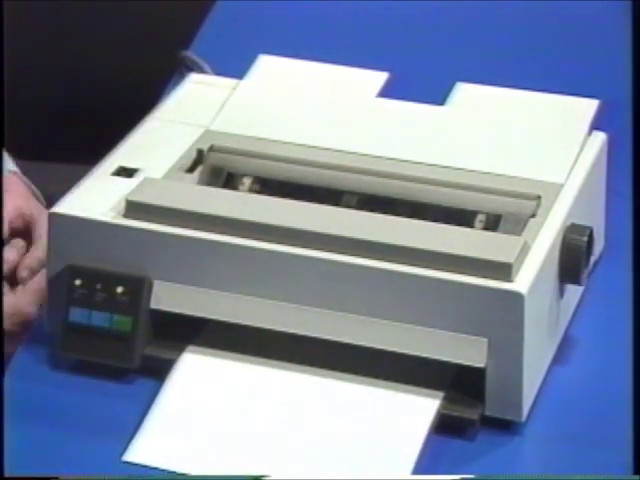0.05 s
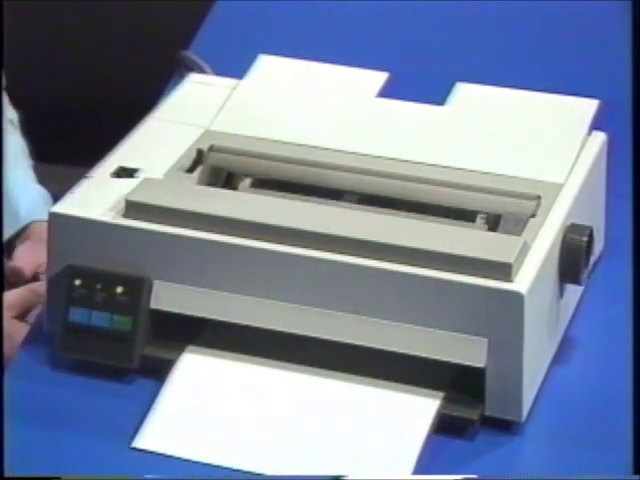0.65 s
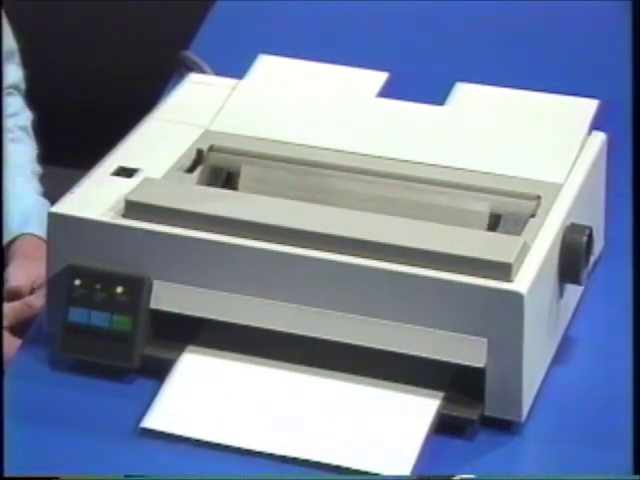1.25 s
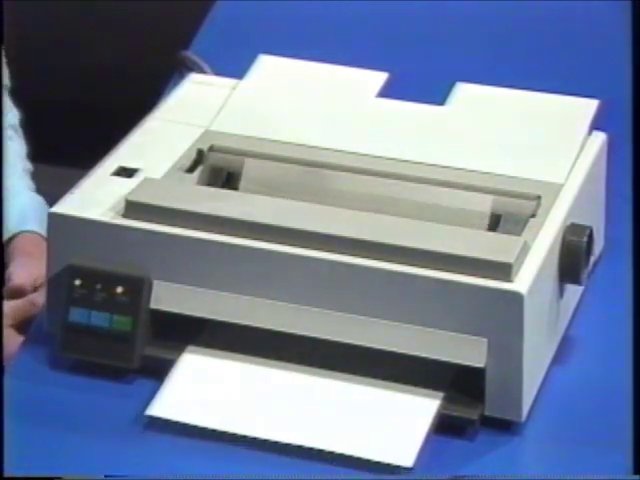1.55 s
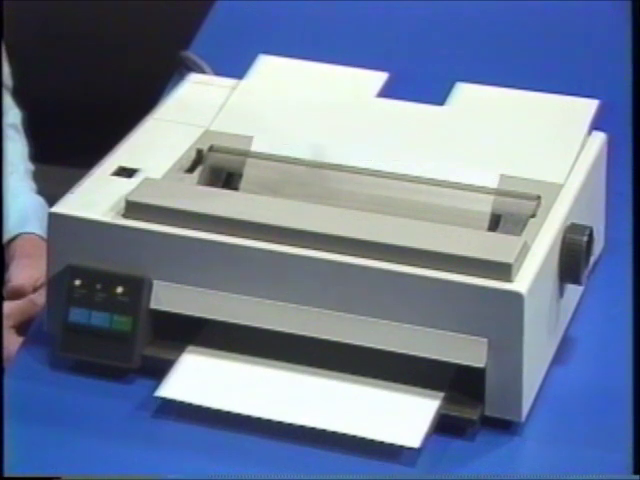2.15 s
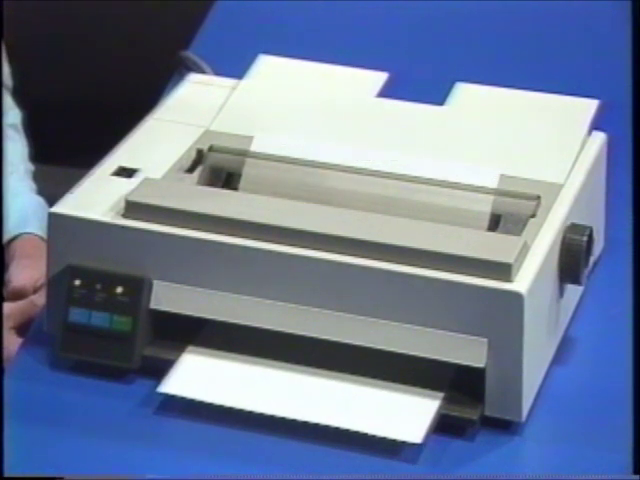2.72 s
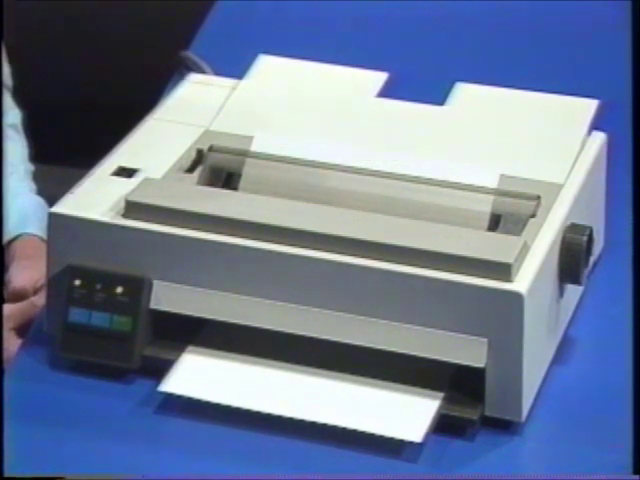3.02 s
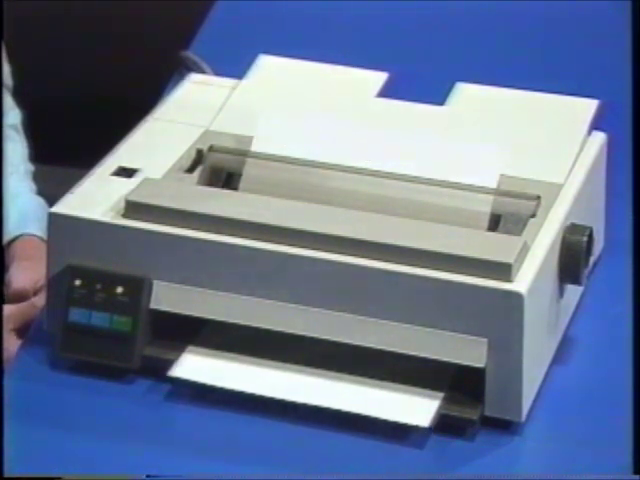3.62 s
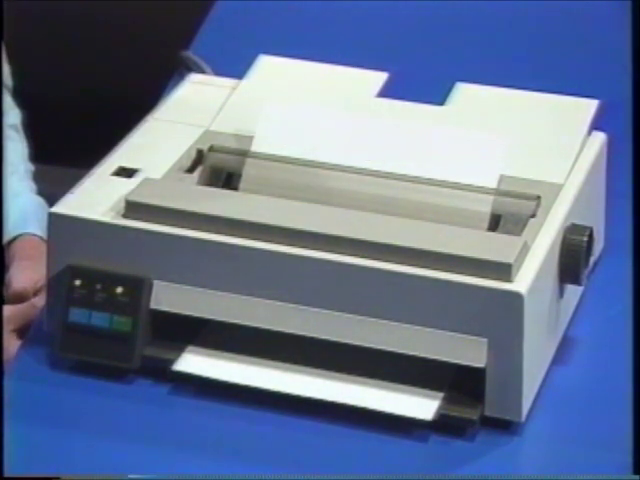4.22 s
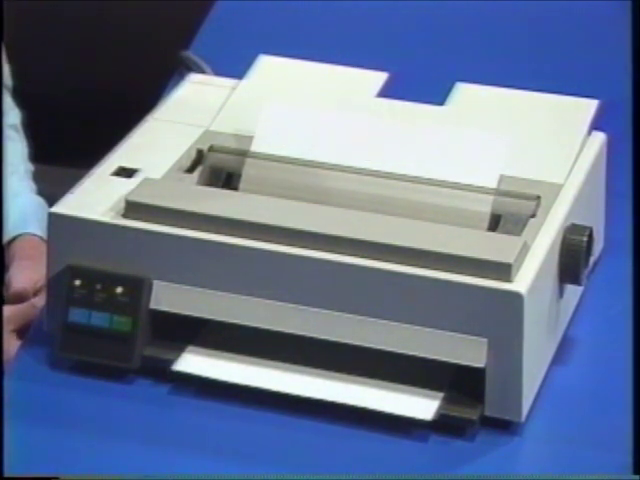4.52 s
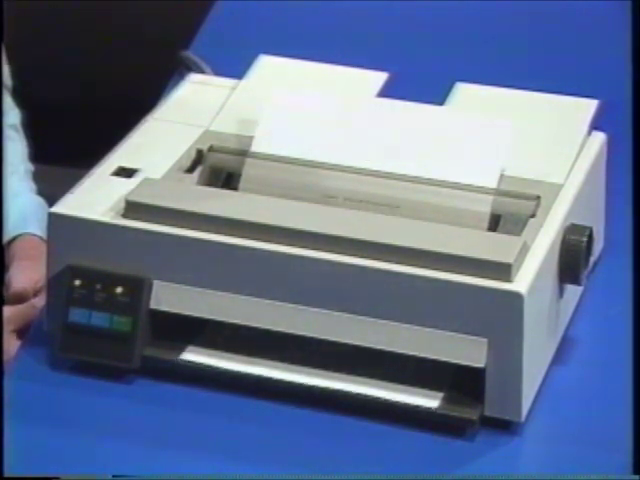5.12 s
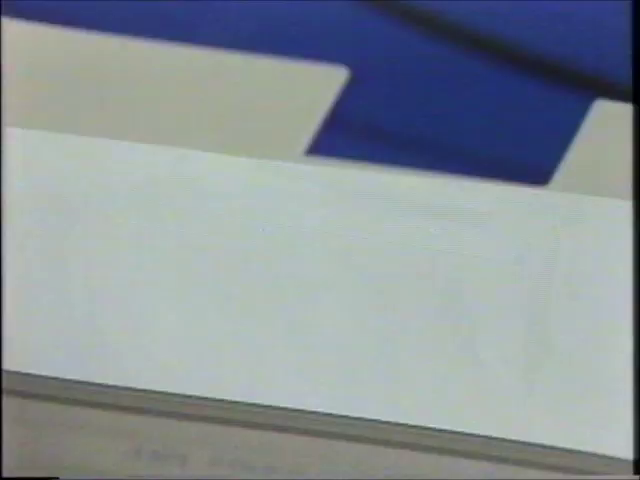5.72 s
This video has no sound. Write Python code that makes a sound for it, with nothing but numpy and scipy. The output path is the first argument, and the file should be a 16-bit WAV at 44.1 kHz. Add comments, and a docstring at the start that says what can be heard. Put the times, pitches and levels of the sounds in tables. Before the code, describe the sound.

Close up in a quiet, dry room, a dot matrix printer alternates between feeding and printing. Its gears clack quickly and regularly in the plastic case as the paper advances, then the carriage knocks into motion and whines on one steady pitch while the pins rattle in sharp, bright bursts. This happens three times, the first feed lasting longest and the last pass being briefest. Faint hum and a thin whistle lie underneath.

```python
"""Quick plastic clacks, seven a second: a dot matrix printer feeds paper, close up in a quiet, dry room.
Each line feed is a set pattern of gear blows ringing in the case, over the grunt of a stepper motor.
Three times the carriage jolts off and whines along its rail while the pins rattle out words on the
motor's step grid, fifty letters a second. Faint room noise, hum and coil whistle lie underneath."""
import sys
import numpy as np
from scipy import signal
from scipy.fft import rfft, irfft
from scipy.io import wavfile
from scipy.ndimage import uniform_filter1d

SR = 44100
rng = np.random.default_rng(int(sys.argv[2]) if len(sys.argv) > 2 else 0)


def to_wav(sig):
    """Store sig (one row per channel, or 1-D mono) as 16-bit WAV at the path in sys.argv[1].

    Samples outside -1..1 are clipped; the rate is SR.
    """
    pcm = np.clip(np.atleast_2d(sig), -1, 1) * 32767
    pcm = np.round(pcm).astype(np.int16)
    wavfile.write(sys.argv[1], SR, pcm.T)  # frames by channels


N = 262836
TIME = np.arange(N) / SR
RING_SIZE = 8192  # samples in an impulse response
RING_TIME = np.arange(RING_SIZE) / SR
FREQS = np.arange(RING_SIZE // 2 + 1) * SR / RING_SIZE + 1
STEP_HZ, LETTER_STEPS = 1202.9, 24  # carriage motor: step rate, steps per letter

# registers of the case (thud, knock, clack, tick): low_hz, high_hz, t60_s, whirr_db
REGISTERS = [(243, 656, 0.1, -52), (718, 2057, 0.053, -52), (2130, 5980, 0.036, -58.5),
             (5130, 23000, .022, -58.5)]
# tone colour of the plastic case: freq_hz, level_db
CASE_COLOUR = [(88, -22), (150, -3), (186, -8), (420, -5.5), (656, -11), (1060, -4.5), (1290, -13.5),
               (1420, -6.5), (2020, -9), (3760, -6), (6470, -16), (8830, -13), (15500, -33)]
# resonances of the case: centre_hz, width_hz, lift_db
CASE_MODES = [(348.4, 19, 7.9), (422, 19, 5.8), (569, 102, 7.4), (784.4, 38, 9.1), (983, 91, 4.8),
              (1091, 27, 7.4), (1182, 140, 8.5), (1437, 17, 8.7), (1660, 100, 7.6), (2620, 370, 10),
              (3152, 180, 11.1), (3756, 340, 7.8), (4400, 110, 1.1), (4810, 1030, 5.6), (7830, 1000, 5),
              (8890, 290, 7.6), (10390, 640, 5.6)]
# passes of the carriage: start_s, end_s, whine_db
CARRIAGE_RUNS = [(2.401, 3.025, -34.5), (4.115, 4.612, -34.5), (5.617, 5.947, -36)]
# printed words, with the relative force on each part: start_s, letters, platen_db, pins_db, shell_db
WORDS = [(2.7045, 3, -26.5, -22.5, -22), (2.782, 10, -28, -24, -25), (4.155, 8, -28.5, -24.5, -28),
         (4.333, 3, -28, -25, -23), (4.413, 8, -28.5, -26, -25), (5.814, 4, -28, -23.5, -22)]


def paper_feed(alike=0.46, whirr_s=0.08, scatter_db=1.12, jitter_s=0.0004):
    """Each feed strikes the case with the same blows, partly with the same ring; gears whirr between."""
    # blows in the four stages of a feed: delay_s, thud_db, knock_db, clack_db, tick_db
    engage = [(0, -57, -45, -40.5, -49), (.0035, -54.5, -47, -44.5, -52)]
    pull = [(.0092, -51, -38.5, -39, -33.5), (0.012, -49, -35, -32, -43.5)]
    rebound = [(0.0218, -49.5, -38, -36, -39), (0.0306, -45.5, -35.5, -34.5, -52),
               (.035, -49.5, -37.5, -40.5, -44.5), (0.042, -60, -68, -53, -62)]
    brake = [(0.067, -65, -51, -43, -41), (0.071, -60, -42.5, -35, -36.5), (.074, -48, -41, -44, -49),
             (0.0803, -50.5, -46.5, -40, -49), (0.091, -50, -43.5, -41, -45),
             (.103, -61, -49.5, -45.5, -59)]
    # usual force of each stage: force_db
    stage_db = [0.5, 1, -3, -1.5]
    # how much each stage varies from feed to feed: scatter_db
    stage_scatter_db = [4.8, 1.13, 0.64, 0.84]
    # feeds whose gears snap in hard: feed_index, engage_db
    snaps = [(0, 10), (2, 8), (3, 8), (5, 8), (6, 10), (8, 7), (14, 5.5), (16, 4.5), (20, 6.5)]
    starts = feed_times()
    turning = gate([(at, at + whirr_s) for at in starts], 0.0052, 0.016)
    blows = [(stage, blow) for stage, rows in enumerate([engage, pull, rebound, brake]) for blow in rows]
    forces = rng.normal(stage_db, stage_scatter_db, (len(starts), len(stage_db)))
    for feed, snap_db in snaps:
        forces[feed, 0] = snap_db
    slack = rng.standard_normal((len(starts), len(blows), 2))  # loose gears vary force and timing
    clacks = 0
    for k, (low_hz, high_hz, t60, whirr_db) in enumerate(REGISTERS):
        drive = undb(whirr_db) * turning * noise()
        fade = decay(t60)
        for b, (stage, (delay, *register_db)) in enumerate(blows):
            same_ring = np.sqrt(alike) * noise(RING_SIZE)
            for at, force_db, (harder, later) in zip(starts, forces, slack[:, b]):
                ring = same_ring + np.sqrt(1 - alike) * noise(RING_SIZE)
                stray_db = scatter_db * (harder + rng.standard_normal())
                size = undb(register_db[k] + force_db[stage] + stray_db)
                add(drive, at + delay + jitter_s * later, size * fade * ring)
        clacks = clacks + through(drive, body(CASE_COLOUR, CASE_MODES, low_hz, high_hz))
    return clacks + gear_teeth(turning)


def feed_times(late_s=0.011):
    """Start of every line feed: evenly paced within a run, the last one a little late."""
    # runs of line feeds: start_s, feeds, period_s
    runs = [(.0344, 17, .14084), (3.0703, 7, .1406), (4.657, 7, .1405)]
    return np.concatenate([at + period * np.arange(n) + late_s * (np.arange(n) == n - 1)
                           for at, n, period in runs])


def gear_teeth(turning, ticks_per_s=70, tick_db=-47, scatter_db=4, ring_s=0.0045, sing_db=-57):
    """While the gears turn, stray teeth tick and the train sings faintly."""
    teeth = (rng.random(N) < ticks_per_s / SR) * undb(scatter_db * np.clip(noise(), -2, 2))
    envelope = through(teeth * turning, decay(ring_s))
    ticks = envelope * through(noise(), body(CASE_COLOUR, CASE_MODES, 890, 10000))
    sing = turning * through(noise(), body([(4650, 0)], [(4615, 180, 17)], 2570, 4640))
    return undb(tick_db) * ticks + undb(sing_db) * sing


def feed_motor(gain_db=1, roughness=0.075):
    """The feed stepper grunts: its rate ramps up and down again within each feed."""
    # the motor's course through one feed: time_s, pitch_hz, relative_db
    ramp = [(0, 247, -56), (0.014, 327, -63), (.04, 402, -59), (0.061, 429, -45.5), (.08, 413, -53),
            (.1, 344, -77), (.13, 264, -81)]
    times, hz, db = np.transpose(ramp)
    phase = 2 * np.pi * np.cumsum(np.interp(RING_TIME, times, hz)) / SR
    swell = undb(gain_db + np.interp(RING_TIME, times, db)) * (RING_TIME < times[-1])
    grunts = np.zeros(N)
    for at in feed_times():
        add(grunts, at, swell * np.sin(phase))
    return grunts * (1 + roughness * sway())


def print_head(rumble_db=-20, case_db=-20):
    """Strikes sound in the platen, pins and head shell; the case rings and a low rumble swells along."""
    # tone colour of a pin strike: freq_hz, level_db
    colour = [(100, 9), (400, -6), (800, -4), (1400, 1.5), (2000, -6), (4000, -4), (6400, -2.5),
              (8000, -1.5), (11000, 0.5), (12400, 2), (13500, -3), (15500, -5.5)]
    # resonances of the head: centre_hz, width_hz, lift_db
    head_modes = [(2520, 300, 8), (3700, 140, 11), (4060, 170, 8), (4850, 200, 9), (5420, 170, 12),
                  (7390, 250, 10), (7840, 220, 8), (8440, 250, 6), (9690, 240, 11), (10230, 180, 11),
                  (10530, 220, 12), (10930, 260, 8), (11450, 260, 8), (14400, 300, 13)]
    # ring of its shell: centre_hz, width_hz, lift_db
    shell_modes = [(12450, 420, 22)]
    platen = strikes(0, body(colour, head_modes, 260, 7230), gain_db=1, ring_s=0.042, jitter_s=40e-6)
    pins = strikes(1, body(colour, head_modes, 7260), gain_db=1, ring_s=0.017, jitter_s=19e-6)
    shell = strikes(2, body(colour, shell_modes, 7800, 13300), gain_db=-2.5, ring_s=0.011, jitter_s=24e-6)
    direct = platen + pins + shell + platen_buzz()
    tail = decay(0.1) * noise(RING_SIZE)
    reverb = through(direct, tail / np.linalg.norm(tail))
    rumble_colour = [(28, 1.5), (45, -4.5), (90, -2.5), (160, -4.5), (300, -16.5)]
    rumble = stroke_force(TIME, part=1) * through(noise(), body(rumble_colour, high_hz=337))
    return direct + undb(case_db) * reverb + undb(rumble_db) * rumble


def strikes(part, response, gain_db, ring_s, jitter_s, favour=0.6, pins=9):
    """Pins fire on the step grid, each with its own ring; each half letter favours a few of them."""
    steps = np.arange(int(N / SR * STEP_HZ) - 2) / STEP_HZ
    force = stroke_force(steps, part)
    half_letter = np.arange(len(steps)) // (LETTER_STEPS // 2)
    favoured = rng.random((len(steps), pins))[half_letter]
    rank = (rng.random((len(steps), pins)) + favour * favoured).argsort(axis=1).argsort(axis=1)
    rattle = 0
    for pin in range(pins):
        fires = rank[:, pin] < 2  # two pins a step
        position = np.clip((steps + jitter_s * noise(len(steps))) * SR, 10, N - 10)[:, None]
        taps = position.astype(int) + np.arange(-7, 9)
        pulses = (force * fires)[:, None] * np.sinc(taps - position)  # clicks land between samples
        clicks = np.bincount(taps.ravel(), pulses.ravel(), N)
        ring = through(decay(ring_s) * noise(RING_SIZE), response)
        rattle = rattle + through(clicks, unit(ring))
    return unit(rattle) * np.sqrt(np.mean(force ** 2)) * undb(gain_db)


def stroke_force(times, part, bar=0.37, upright_s=0.0039, rise_s=0.0014, gap_s=0.00096):
    """Force on a part (0 platen, 1 pins, 2 shell): uprights hit hard, bars lightly, gaps not at all."""
    # upright strokes within a letter: delay_s, strength
    uprights = [(0.0008, 0.87), (.0085, 0.26), (0.0129, .62)]
    # scatter from letter to letter: platen_db, pins_db, shell_db
    scatter_db = [1.5, 2.05, 2.5]
    force, letter_s = np.zeros(len(times)), LETTER_STEPS / STEP_HZ
    for (_, letters, *part_db), (start, end) in zip(WORDS, word_spans()):
        inside = (times >= start) & (times < end)
        letter, into_letter = np.divmod(times[inside] - start, letter_s)
        strokes = bar
        for delay, strength in uprights:
            age = np.maximum(into_letter - delay, 0)
            strokes = strokes + strength * np.minimum(age / rise_s, 1) * np.exp(-(age / upright_s) ** 2)
        letter_db = part_db[part] + scatter_db[part] * noise(round(letters) + 1)
        force[inside] = undb(letter_db[letter.astype(int)]) * strokes * (into_letter < letter_s - gap_s)
    return force


def word_spans():
    """Start and end of each word; a letter takes a set number of carriage steps."""
    return [(at, at + round(letters) * LETTER_STEPS / STEP_HZ) for at, letters, *_ in WORDS]


def platen_buzz(depth=0.26, wander_rad=0.29):
    """Strikes in step pile up to a tone; its overtones waver, as under a changing dot pattern."""
    # overtones of the step rate: harmonic, relative_db
    overtones = [(2, -11), (3, -13), (4, -8.5), (5, -18), (6, -19), (7, -15)]
    force = uniform_filter1d(stroke_force(TIME, part=0), size=128)
    phase = 2 * np.pi * STEP_HZ * TIME
    tone = sum(undb(db) * (1 + depth * sway(8.7)) * np.sin(round(k) * phase + wander_rad * sway(6))
               for k, db in overtones)
    return np.sqrt(2) * force * tone


def carriage_jolts(gain_db=2, ring_s=(0.08, 0.062, 0.048, 0.045)):
    """The carriage jerks its belt and shakes the frame, which rings lower than the feed gears."""
    # jolts as it starts, turns and stops: start_s, blow_db, rebound_db, tilt_db (per register)
    jolts = [(2.398, -1, 2.5, -1), (2.456, -4, 5.5, 2.5), (3.027, -4, -5.5, -3), (4.025, 2.5, 2.5, -1),
             (4.071, -4, -0.5, -2.5), (4.102, 0.5, -2.5, -1), (4.614, -4.5, -5.5, -2), (5.611, 0, -3, -0.5),
             (5.941, -1.5, -11, -1.5)]
    # blow and rebound of every jolt: delay_s, thud_db, knock_db, clack_db, tick_db
    blows = [(0, -40.5, -33, -39, -39), (.0092, -39.5, -37.5, -41, -52)]
    frame_modes = CASE_MODES + [(275.5, 23, 10.0), (912, 208, 10.5)]
    knocks = 0
    for k, (low_hz, high_hz, _, _) in enumerate(REGISTERS):
        drive = np.zeros(N)
        height = k - (len(REGISTERS) - 1) / 2
        for at, *force_db, tilt_db in jolts:
            for db, (delay, *register_db) in zip(force_db, blows):
                size = undb(gain_db + db + register_db[k] + tilt_db * height)
                add(drive, at + delay, size * decay(ring_s[k]) * noise(RING_SIZE))
        knocks = knocks + through(drive, body(CASE_COLOUR, frame_modes, low_hz, high_hz))
    return knocks


def carriage(slide_db=-50, flutter=0.013, fade_db_per_s=8, dip_db=-1.5):
    """The stepper whines at its step rate, fluttering with the belt; the carriage slides on its rail."""
    # partials of the whine: harmonic, relative_db
    partials = [(1, -1.5), (2, -29), (3, -22), (4, -41), (5, -35), (7, -61), (9, -47)]
    # tone colour of the sliding: freq_hz, level_db
    rail_colour = [(100, 0), (320, -1), (480, -13), (720, -5), (860, -1), (1050, 2), (1400, 0), (2000, -12),
                   (3700, -9.5), (6000, -21.5), (10000, -13), (15000, -15)]
    moving = gate([(start, end) for start, end, _ in CARRIAGE_RUNS], 0.0018, 0.0017)
    level = sum(gate([(start, end)], 0.0057, 0.0012) * undb(db - fade_db_per_s * (TIME - start))
                for start, end, db in CARRIAGE_RUNS)
    dip = undb(dip_db * gate(word_spans(), 0.0042, 0.0056))  # softer while the pins strike
    phase = 2 * np.pi * STEP_HZ * TIME + flutter * sway()
    tone = np.sqrt(2) * sum(undb(db) * np.sin(round(k) * phase) for k, db in partials)
    whine = tone * (1 + flutter * sway()) * level * dip
    slide = moving * undb(slide_db) * through(noise(), body(rail_colour))
    return whine + slide


def coil_whistle(gain_db=3, wobble_rad=0.23):
    """The motor coils whistle while they hold still."""
    # coil tones: pitch_hz, relative_db
    whistles = [(6140, -68), (12290, -76)]
    travelling = [(start - 0.1, end) for start, end, _ in CARRIAGE_RUNS]
    feeding = [(at - 0.011, at + 0.061) for at in feed_times()]
    resting = np.maximum(1 - gate(travelling + feeding, 0.0011, 0.002), 0)
    return resting * sum(sine(hz, db + gain_db, wobble_rad * sway(150)) for hz, db in whistles)


def room_tone(level_db=-53, side_db=-15):
    """Soft room noise, wider in the bass, with a steady hum."""
    # tone colour of the room noise: freq_hz, level_db
    colour = [(20, -3), (30, 6.5), (40, -8), (65, 2.5), (120, -5.5), (170, -3.5), (300, -4.5), (560, -10),
              (750, -14), (1100, -21.5), (2000, -26.5), (5000, -27), (7000, -29.5), (10000, -32),
              (15500, -26.5)]
    # mains hum and a thin high whistle: pitch_hz, level_db
    hum = [(60, -73), (120, -64), (15734, -71.5)]
    side_colour = [(30, 26), (150, 6), (500, 11), (1500, -18), (15000, -28)]
    mid = undb(level_db) * through(noise(), body(colour, low_hz=15.3))
    side = undb(level_db + side_db) * through(noise(), body(side_colour))
    return mid + sum(sine(hz, db) for hz, db in hum) + side * np.array([[1], [-1]])


def widen(x, width_db=-17, t60=0.012):
    """A faint, short smear, opposite in the two channels, widens the highest treble."""
    treble = body([(2000, -35), (6000, -19), (9000, 0), (11000, 0), (15000, 7)])
    treble_spread = unit(through(decay(t60) * noise(RING_SIZE), treble)) / np.sqrt(RING_SIZE)
    return x + undb(width_db) * through(x, treble_spread) * np.array([[1], [-1]])


def body(colour, modes=(), low_hz=1, high_hz=SR):
    """Impulse response of unit energy: a colour, lifted at its resonances, within a band."""
    hz, db = np.transpose(colour)
    db = np.interp(np.log(FREQS), np.log(hz), db)
    for centre, width, lift in modes:
        db = db + lift / (1 + (2 * (FREQS - centre) / width) ** 2)
    band = 1 / np.sqrt((1 + (low_hz / FREQS) ** 20) * (1 + (FREQS / high_hz) ** 20))
    cepstrum = irfft(np.log(undb(db) * (band + 1e-3)))
    cepstrum[1:RING_SIZE // 2] *= 2  # minimum phase: nothing rings before the hit
    cepstrum[RING_SIZE // 2 + 1:] = 0
    response = irfft(np.exp(rfft(cepstrum)))
    return response / np.linalg.norm(response)


def sway(hz=40):
    """Random wobble of rms 1, mostly slower than hz."""
    return unit(through(noise(), body([(hz / 4, 0), (hz, -4), (5 * hz, -24)], high_hz=5 * hz)))


def gate(spans, rise_s, fall_s):
    """Envelope that ramps to 1 from the start of each span and dies away after its end."""
    return sum(np.clip((TIME - start) / rise_s, 0, 1) * np.exp(-np.maximum(TIME - end, 0) / fall_s)
               for start, end in spans)


def decay(t60):
    """Envelope that falls 60 dB in t60 seconds."""
    return np.exp(-np.log(1000) * RING_TIME / t60)


def sine(hz, db, drift_rad=0):
    """Pure tone at an rms level."""
    return np.sqrt(2) * undb(db) * np.sin(2 * np.pi * hz * TIME + drift_rad)


def noise(size=N):
    """White noise."""
    return rng.standard_normal(size)


def through(x, response):
    """Play x through an impulse response."""
    return signal.fftconvolve(x, response)[:len(x)]


def add(out, at, sound):
    """Mix a sound in at a time in seconds."""
    i = max(int(at * SR), 0)
    out[i:i + len(sound)] += sound[:max(N - i, 0)]


def undb(db):
    """Decibels to gain."""
    return 10 ** (np.asarray(db) / 20)


def unit(x):
    """Scale to rms 1."""
    return x / np.sqrt(np.mean(x ** 2))


def scene():
    """The printer stands straight ahead in a quiet room."""
    printer = paper_feed() + feed_motor() + carriage_jolts() + carriage() + print_head()
    return widen(printer) + coil_whistle() + room_tone()


def record(dry):
    """The recorder rounds the peaks, sets its channels a hair apart in level and time and cuts the top."""
    # tilt of the left channel: freq_hz, gain_db
    left_tilt = [(200, -1.6), (380, -.5), (700, -.05), (4400, -.1), (12000, -.5)]
    ceiling, right_lag_s, top_hz = 0.35, 1.5e-6, 15800
    hz = np.fft.rfftfreq(N, 1 / SR)
    tilt_hz, tilt_db = np.transpose(left_tilt)
    left = undb(np.interp(np.log(hz + 1), np.log(tilt_hz), tilt_db))
    right = np.exp(-2j * np.pi * hz * right_lag_s)
    low_pass = 1 / (1 + (hz / top_hz) ** 400)
    rounded = ceiling * np.tanh(dry / ceiling)
    return irfft(rfft(rounded) * np.array([left, right]) * low_pass, N)


dry = scene()
out = record(dry)
to_wav(out)
```